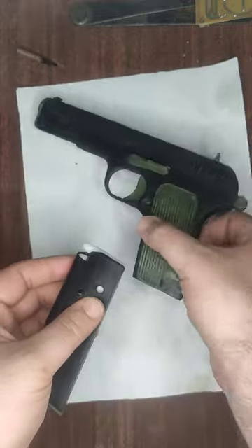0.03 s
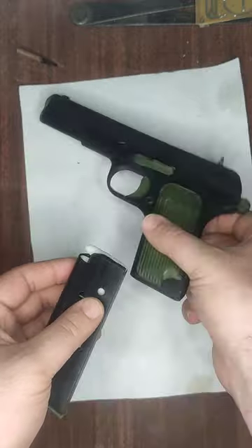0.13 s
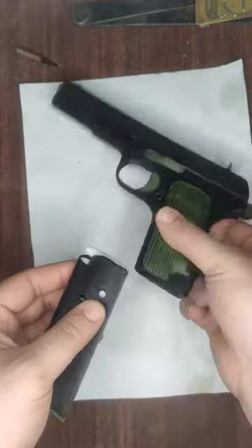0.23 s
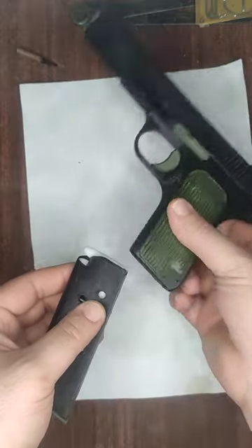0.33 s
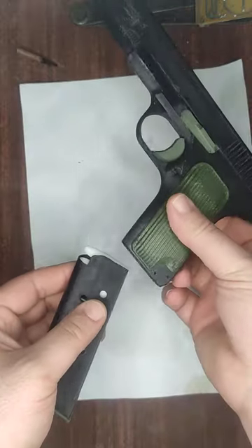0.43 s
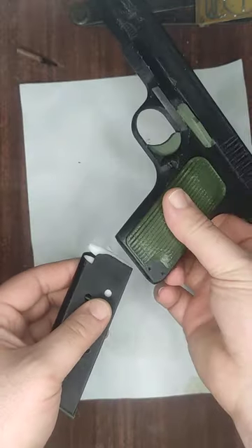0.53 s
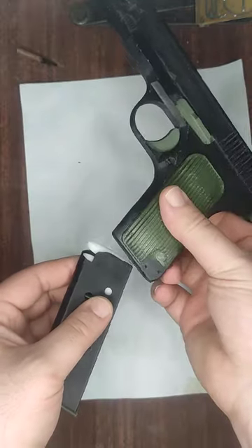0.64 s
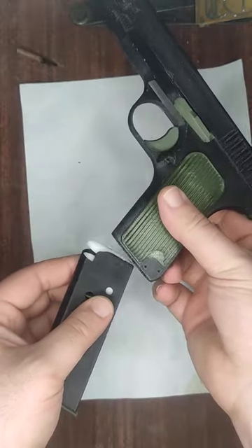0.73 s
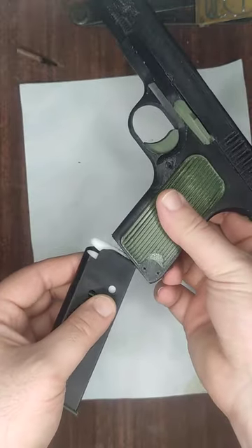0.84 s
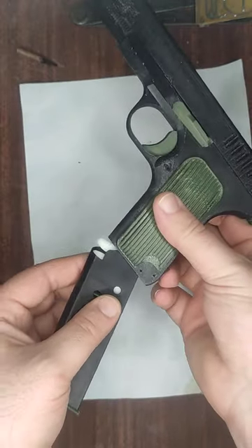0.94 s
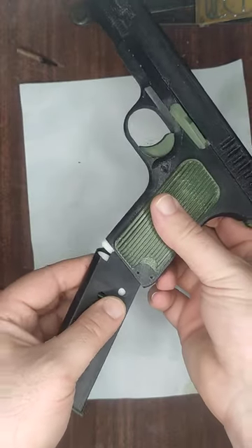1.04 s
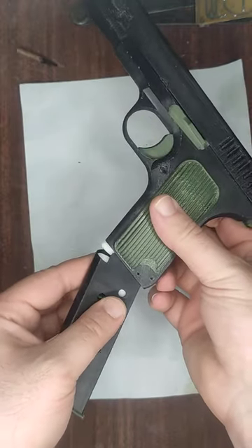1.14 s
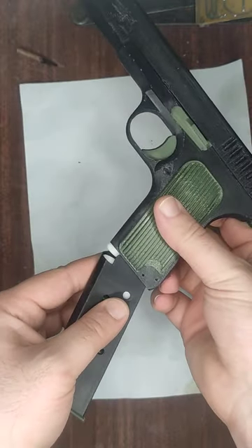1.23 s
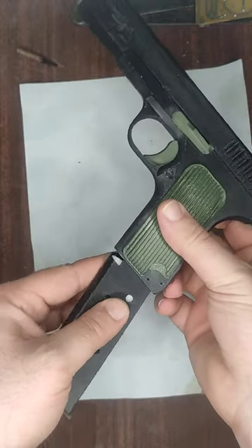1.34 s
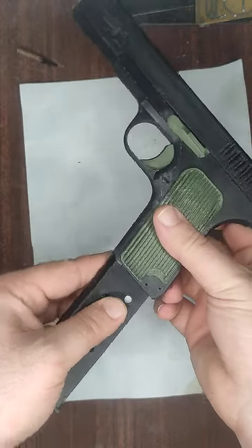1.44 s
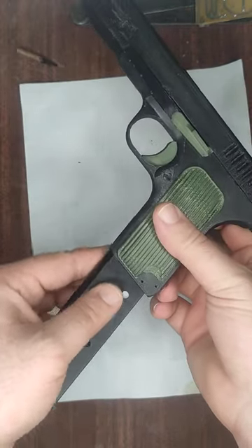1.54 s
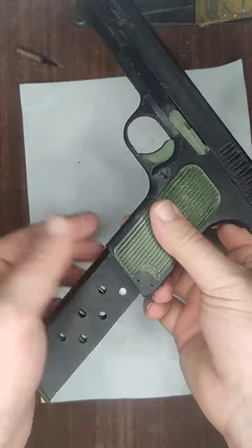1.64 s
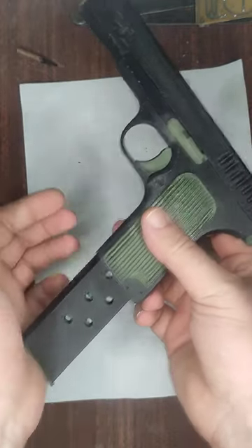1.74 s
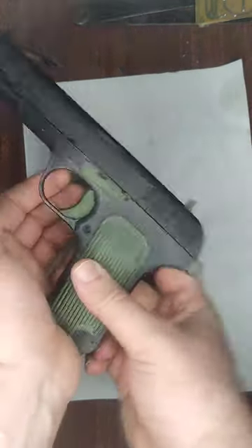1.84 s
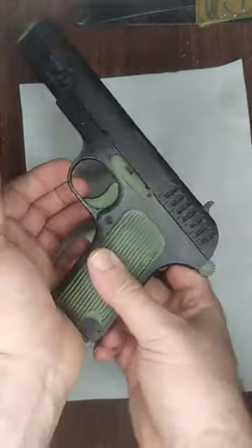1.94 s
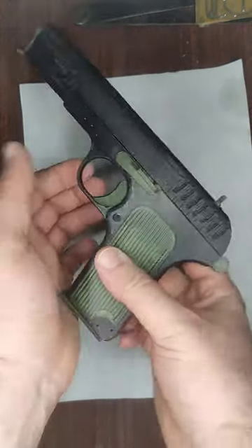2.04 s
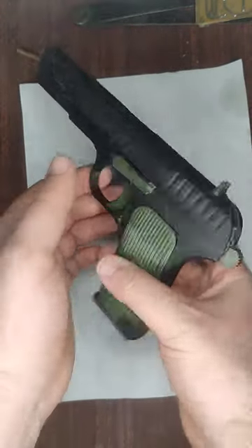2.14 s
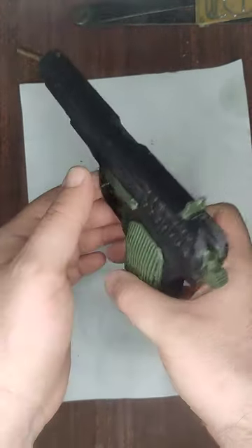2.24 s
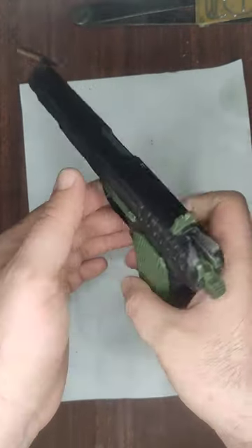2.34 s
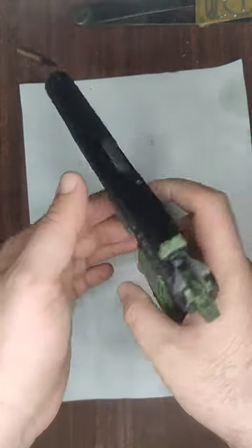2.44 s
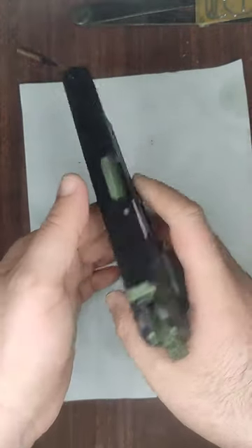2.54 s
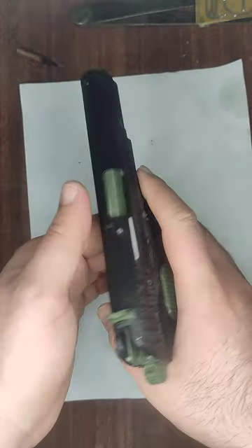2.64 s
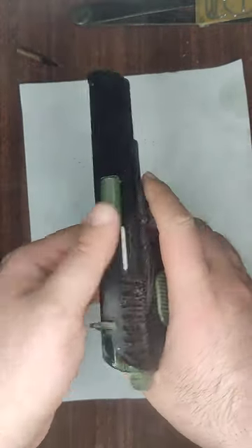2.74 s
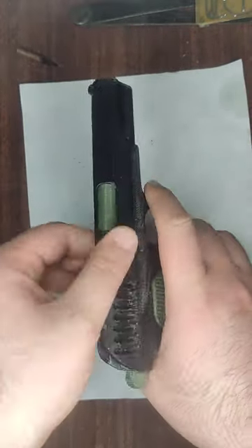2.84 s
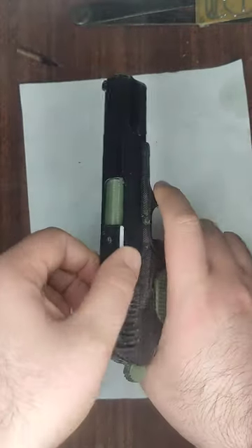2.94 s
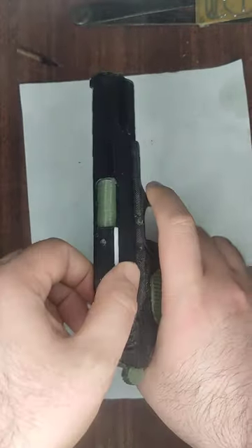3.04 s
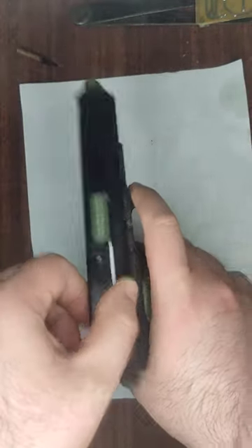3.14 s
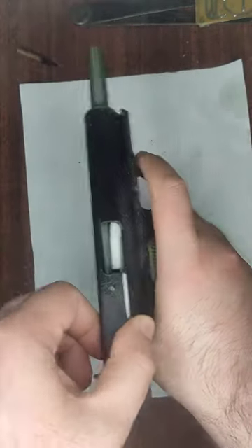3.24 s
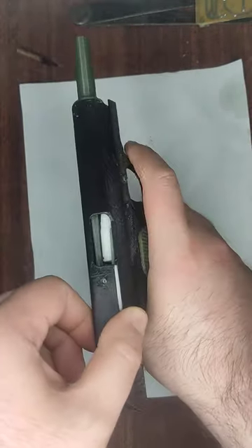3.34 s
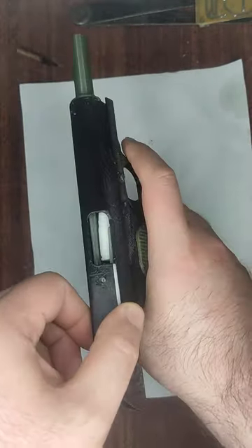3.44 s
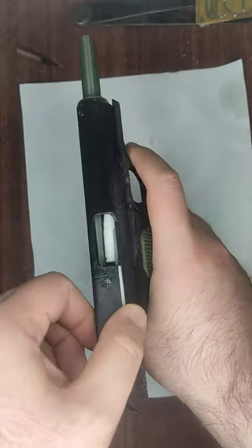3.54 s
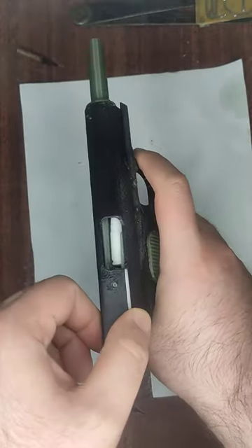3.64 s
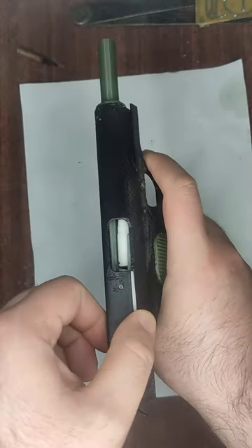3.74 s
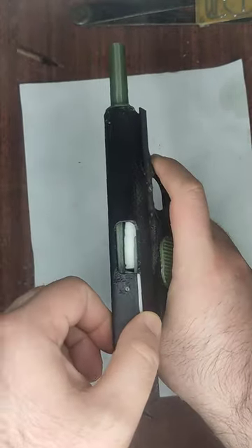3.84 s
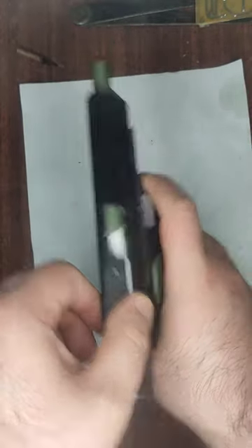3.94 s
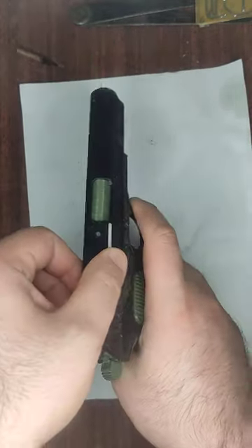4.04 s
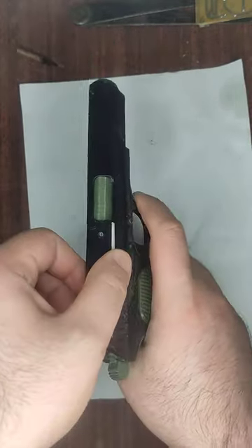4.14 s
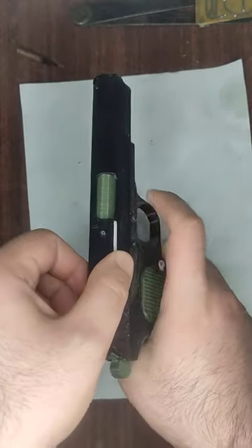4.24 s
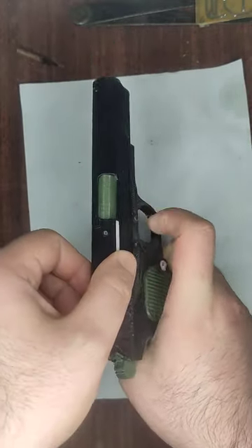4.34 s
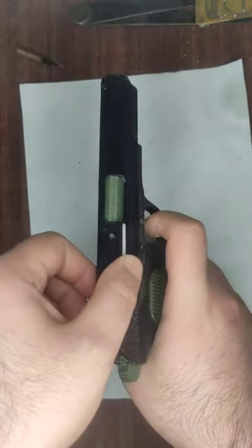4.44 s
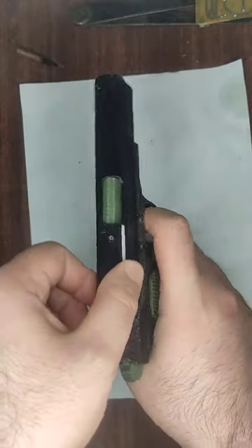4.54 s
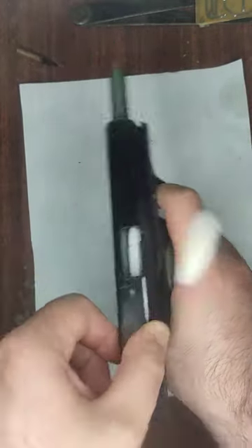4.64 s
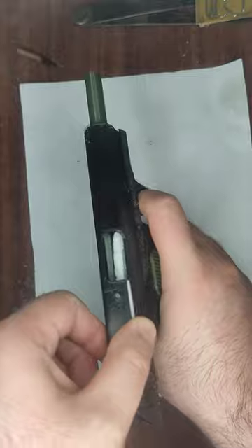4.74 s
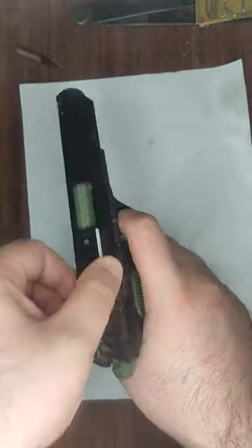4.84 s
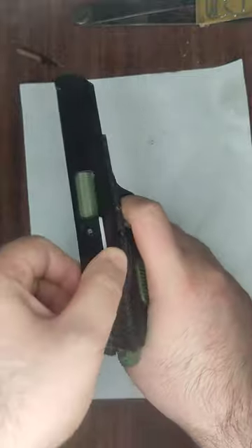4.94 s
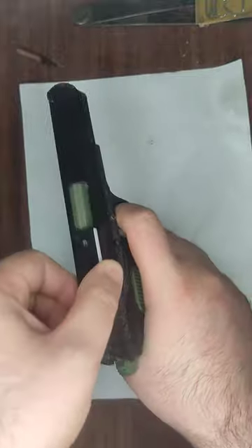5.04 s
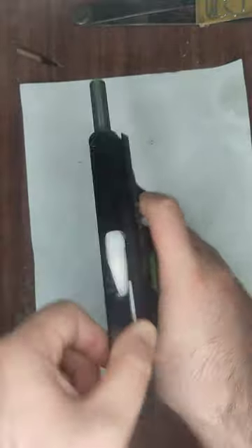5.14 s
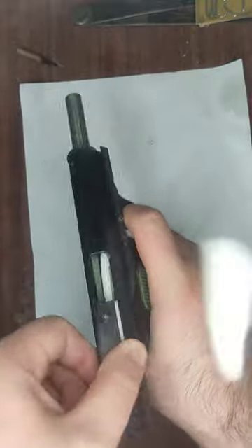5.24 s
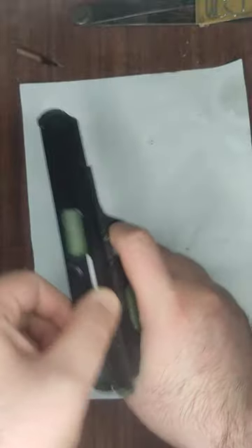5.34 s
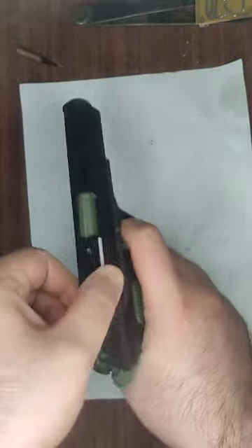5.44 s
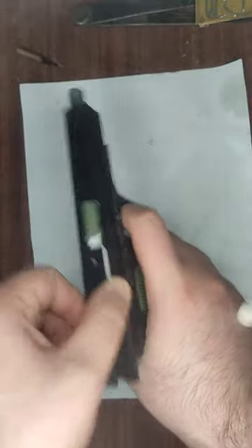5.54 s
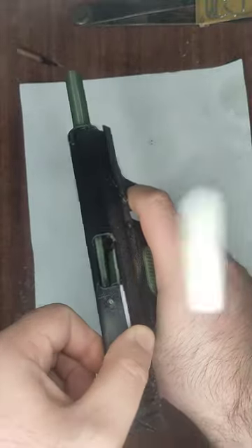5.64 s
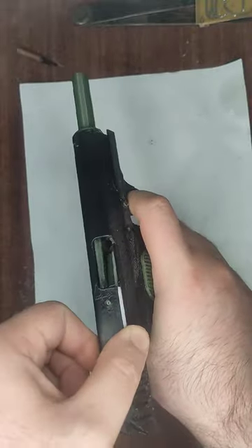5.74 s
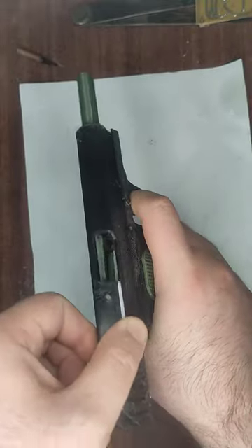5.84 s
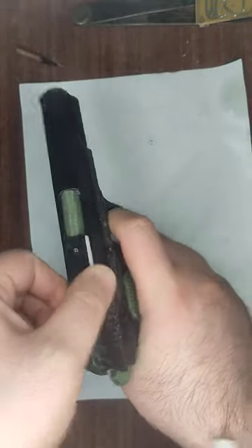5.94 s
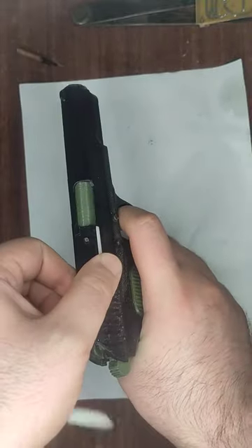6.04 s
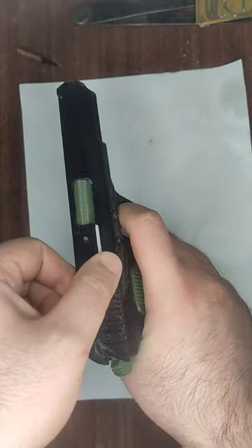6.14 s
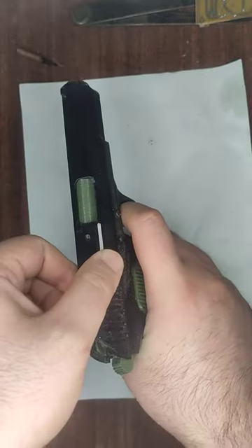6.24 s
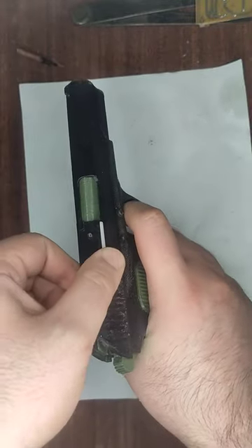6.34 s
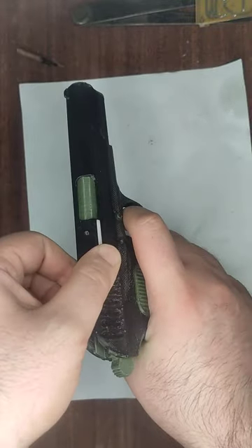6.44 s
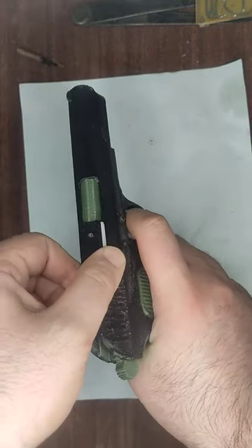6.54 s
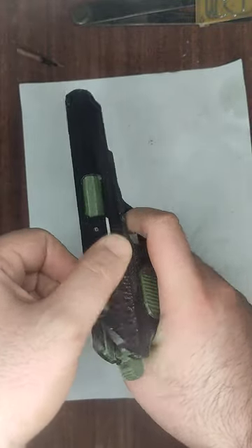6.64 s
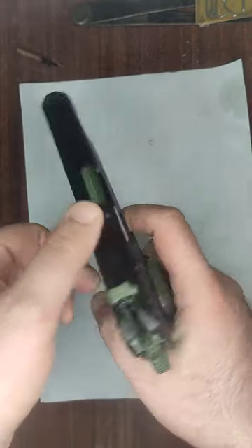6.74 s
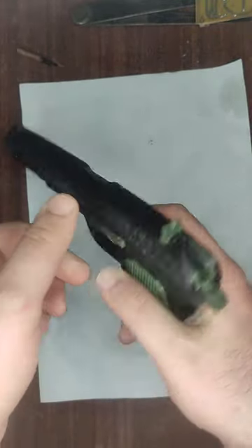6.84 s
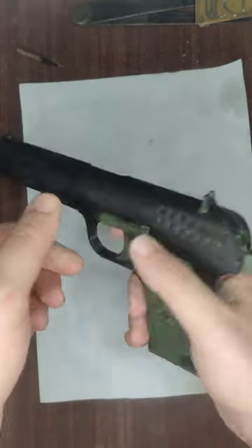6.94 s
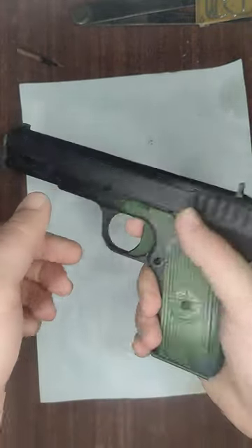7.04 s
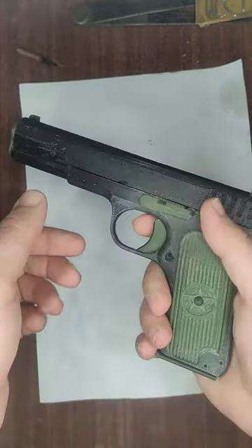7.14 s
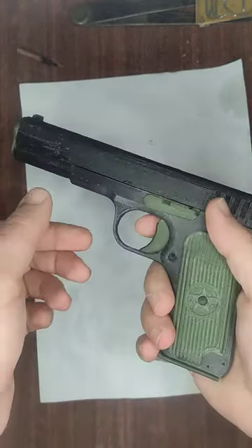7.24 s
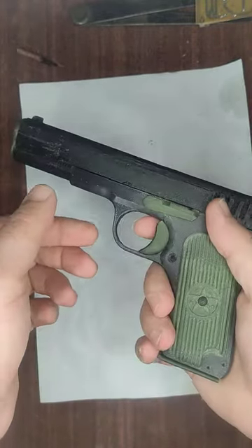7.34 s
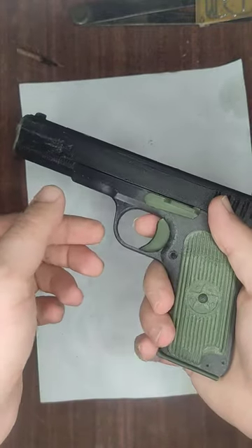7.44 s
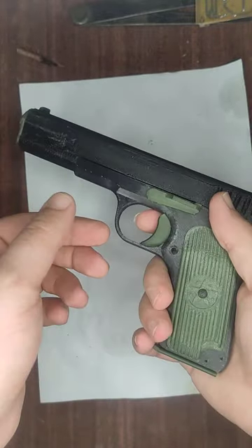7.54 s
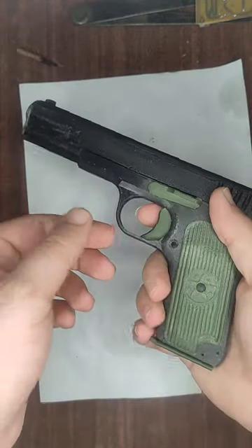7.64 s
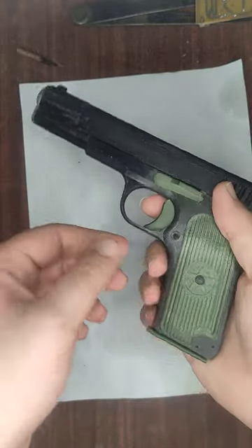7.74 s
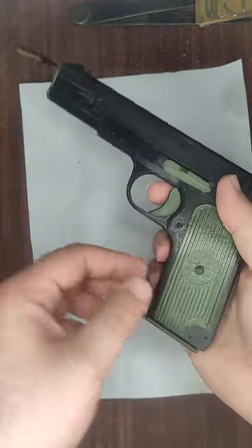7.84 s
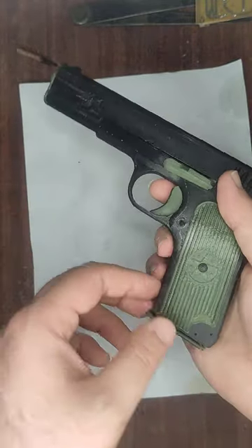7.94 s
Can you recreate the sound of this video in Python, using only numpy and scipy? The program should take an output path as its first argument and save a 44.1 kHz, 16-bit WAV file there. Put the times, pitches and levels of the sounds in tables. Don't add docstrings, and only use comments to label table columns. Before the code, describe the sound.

In a small room with a faint wavering fan hum and soft hiss, hands handle a hard plastic toy pistol close to a stereo microphone. From 0 to 1.7 seconds there are only faint skin rubs and small hollow ticks as the magazine finds its well. At about 1.8 to 1.95 it slides in with a dense rattle ending in firm clacks. Light grip shifts follow. At 3.25 the slide is jerked back with a loud scraping crack, and at 4.05 it snaps forward. Faster rackings come at 4.7 and 4.9, 5.2 and 5.45, then 5.65 and about 6.0, with sharp clicks and small air puffs between. From 5.7 a shell strikes the desk with a thin bright ring; bounces continue, strong at 6.22, tightening into a rattling roll that stops near 7.07. Quiet touches and a faint low thud at 7.5 close it.

```python
import sys
import numpy as np
from scipy import signal
from scipy.fft import rfft, irfft, next_fast_len
from scipy.io import wavfile
from scipy.ndimage import uniform_filter1d, minimum_filter1d, map_coordinates

SR = 44100
rng = np.random.default_rng(int(sys.argv[2]) if len(sys.argv) > 2 else 0)


def ratio_of_db(decibels):
    return 10 ** (np.asarray(decibels, float) / 20)


def to_wav(sig):
    pcm = np.clip(np.atleast_2d(sig), -1, 1) * 32767
    pcm = np.round(pcm).astype(np.int16)
    wavfile.write(sys.argv[1], SR, pcm.T)


N = 352781
TOP_HZ = 15900


def unit(x):
    return x / np.sqrt(np.mean(x ** 2) + 1e-20)


def along(points, hz):
    f, v = np.transpose(points)
    return np.interp(np.log(hz + 1), np.log(f + 1), v)


def wobble(rate):
    knots = rng.standard_normal(int(N * rate / SR) + 4)
    return map_coordinates(knots, [np.arange(N) * rate / SR])


def noise():
    return rng.standard_normal((2, N))


def filtered(x, response):
    m = next_fast_len(N + SR // 2)
    return irfft(rfft(x, m) * response(np.fft.rfftfreq(m, 1 / SR)), m)[..., :N]


def causal(x, gain):
    g = gain(np.fft.rfftfreq(8192, 1 / SR))
    cepstrum = irfft(np.log(g + 1e-6))
    cepstrum[1:len(cepstrum) // 2] *= 2
    cepstrum[len(cepstrum) // 2 + 1:] = 0
    pulse = irfft(np.exp(rfft(cepstrum))) / np.sqrt(np.mean(g ** 2))
    return signal.oaconvolve(x, pulse[None], axes=1)[:, :N]


def resonances(modes, f):
    total = 0
    for k, (hz, width, db) in enumerate(modes):
        total = total + (-1) ** k * ratio_of_db(db) * 1j * f * width / (hz * hz - f * f + 1j * f * width)
    return total


def struck(rows, knock_db, lost, ms):
    return [(s, db, knock_db - lost * db, edge_db, hz, ms) for s, db, edge_db, hz in rows]


def rubbed(rows, knock_db, lost):
    return [(*row, knock_db - lost * max(row[2:]), edge_db) for *row, edge_db in rows]


def struck_part(burst, hz, q, db):
    noted = burst + ratio_of_db(db) * signal.lfilter(*signal.iirpeak(hz, q, SR), burst)
    return noted / uniform_filter1d(abs(noted), size=40, axis=1).max(axis=1, keepdims=True)


def add(force, s, burst, knock_db, edge_db):
    at = round(s * SR)
    force[:, :, at:at + burst.shape[1]] += burst * ratio_of_db([[[0]], [[knock_db]], [[edge_db]]])


def contact_shape(t, ms):
    chatter = ratio_of_db(2.5 * np.repeat(rng.standard_normal(len(t) // 30 + 1), 30)[:len(t)])
    blow = (1 - np.exp(-abs(t) / 0.00089)) * np.exp(-(abs(t) / (abs(ms) / 1000)) ** 1.32) * (t > 0)
    crack = ratio_of_db(-3.5) * np.exp(-abs(t - 0.001) / 0.0006) * (t > 0.001)
    graze = ratio_of_db(-19.5) * np.exp(-abs(t) / 0.002)
    return (blow + crack + graze) * chatter


def stick_slip():
    return np.clip(wobble(500), -3, 2.6)


def worked(body, modes, contacts, strokes, knock_db, edge_db, grit_db, note_db):
    # f/Hz, width/Hz, level/dB
    desk_modes = [(255, 110, -3.5), (371, 83, 3), (583, 270, -1.5)]
    lead_s = 0.006
    force = np.zeros((3, 2, N + SR))
    t = np.arange(SR // 20) / SR - lead_s
    for s, db, low_db, high_db, hz, ms in contacts:
        push = contact_shape(t, ms) * rng.standard_normal((2, len(t)))
        burst = struck_part(push, hz, q=5.9, db=note_db)
        add(force, s - lead_s, ratio_of_db(db - 11.5) * burst, low_db + knock_db, high_db + edge_db)

    catch = stick_slip()
    slips = ratio_of_db(grit_db * (catch + 0.5 * catch ** 2) + 2.2 * wobble(90))
    grit = unit(slips * noise())
    for start, end, start_db, end_db, low_db, high_db in strokes:
        rub = grit[:, round(start * SR):round(end * SR)]
        add(force, start, rub * ratio_of_db(np.linspace(start_db, end_db, rub.shape[1])), low_db, high_db)

    def edge(hz):
        return 1 / (1 + (6500 / (hz + 1)) ** 6)

    def walls(hz):
        return ratio_of_db(along(body, hz)) * (1 + sum(abs(resonances([mode], hz)) for mode in modes))

    def desk(hz):
        return abs(resonances(desk_modes, hz)) / (1 + (hz / 750) ** 4) / (1 + (190 / (hz + 1)) ** 4)

    dull = causal(force[0], lambda hz: walls(hz) * (1 - edge(hz)))
    sharp = causal(force[2], lambda hz: walls(hz) * edge(hz))
    knock = causal(force[1].mean(0) * 1.28 + 0.48 * force[1], desk)
    return dull + sharp + knock


def slide():
    # t/s, peak level/dB, bright edge level/dB, note f/Hz
    pulls = [(3.25, -0.5, -11.5, 1140), (3.258, -12.5, -33, 1400), (3.286, -14.5, -5.5, 2800),
             (3.293, -5.5, -8.5, 2600), (3.303, -18.5, -17, 3300), (4.676, -2.5, -8.5, 1860),
             (4.709, -5, -8, 5000), (4.718, -0.5, -13.5, 2340), (4.728, -18.5, -23, 4630),
             (4.733, -19.5, -25.5, 1500), (5.195, -0.5, -13.5, 2300), (5.235, -6, -25, 1890),
             (5.244, -3.5, -12, 2920), (5.256, -15, -28, 1320), (5.639, -1.5, -10, 2230),
             (5.677, -6, -9.5, 1860), (5.688, -4, -13.5, 1340)]
    # t/s, peak level/dB, bright edge level/dB, note f/Hz
    returns = [(4.03, -14.5, -10, 3440), (4.056, -9, -4.5, 3000), (4.063, -6.5, -3.5, 3080),
               (4.073, -1.5, -9, 1560), (4.084, -14, -18.5, 1573), (4.09, -17.5, -21.5, 1500),
               (4.869, -16, -8.5, 3450), (4.876, -17, -0.5, 3000), (4.882, -15.5, -1, 3280),
               (4.889, -7.5, -5, 2560), (4.9, -6.5, -11, 2900), (4.911, -1.5, -28, 1550),
               (5.401, -22, -21.5, 2400), (5.412, -9, -21.5, 2190), (5.428, -11, -6, 1530),
               (5.434, -13, -15.5, 1500), (5.454, -7, -32.5, 2820), (5.476, -19, -26.5, 2500),
               (6.029, -22.5, -5, 2310), (6.035, -15.5, -9, 2600), (6.043, -11, -23, 1530),
               (6.052, -15, -22.5, 1890)]
    # t/s, peak level/dB, bright edge level/dB, note f/Hz
    snaps = [(1.92, -8, -9, 1410), (1.925, -6.5, -7, 4700), (1.935, -6.5, -12.5, 1460),
             (1.941, -9, -11.5, 1900), (2.037, -33, -25, 2500), (3.225, -37, -12.5, 1950),
             (3.593, -46.5, -35, 1400), (3.989, -44.5, -9.5, 2066), (4.587, -37, -15, 1040),
             (4.621, -47.5, -9, 1170), (4.647, -29.5, -9.5, 1480), (4.815, -1.5, -16.5, 1020),
             (4.989, -1, -13, 3000), (5.136, -8.5, -10, 4200), (5.141, -14.5, -9, 2380),
             (5.147, -17.5, -14, 3000), (5.361, -17, -17, 1550), (5.368, -17, -26.5, 2500),
             (5.507, -3, -17.5, 2880), (5.809, -1.5, -11, 3420)]
    # start t/s, end t/s, start level/dB, end level/dB
    strokes = [(1.853, 1.941, -38, -17), (3.229, 3.249, -57, -34.5), (3.248, 3.305, -25.5, -24.5),
               (4.001, 4.027, -50, -32), (4.028, 4.056, -27, -19.5), (4.053, 4.068, -19.5, -22.5),
               (4.074, 4.091, -32, -36), (4.68, 4.735, -25, -26.5), (4.87, 4.884, -22.5, -19),
               (4.889, 4.906, -21, -19.5), (4.914, 4.928, -29.5, -35.5), (4.999, 5.059, -28, -26.5),
               (5.137, 5.212, -25, -40), (5.193, 5.256, -29.5, -24.5), (5.391, 5.426, -38.5, -28),
               (5.426, 5.48, -21, -40.5), (5.635, 5.7, -32, -35.5), (5.976, 6.044, -45.5, -32.5),
               (6.97, 7.08, -53, -46)]
    # f/Hz, level/dB
    frame_colour = [(290, -48.5), (500, -10), (1090, 3.5), (1840, -0.5), (2390, 0.5), (5190, -2),
                    (7170, -7), (10200, -7.5), (11100, -10.5), (15300, -16), (16500, -39)]
    # f/Hz, width/Hz, level/dB
    frame_modes = [(1500, 800, -3), (2900, 1400, -2), (4790, 440, -3), (8800, 590, -1), (9960, 1000, -2)]
    contacts = struck(pulls, knock_db=-28.5, lost=0.87, ms=3.64)
    contacts += struck(returns, knock_db=-31.5, lost=0.9, ms=4.7)
    contacts += struck(snaps, knock_db=-28, lost=0.25, ms=3.3)
    rails = [(*row, 11 + 0.7 * max(row[2:])) for row in strokes]
    return worked(frame_colour, frame_modes, sorted(contacts), rubbed(rails, knock_db=-37.5, lost=0.54),
                  knock_db=8.5, edge_db=8.0, grit_db=1.0, note_db=1.5)


def magazine():
    # t/s, peak level/dB, bright edge level/dB, note f/Hz
    fitting = [(0.674, -27, -20, 1550), (0.691, -39, -35, 1500), (0.748, -37.5, -19, 1640),
               (0.845, -48, -20, 1480), (0.958, -34, -36, 1500), (0.966, -33, -36, 1260),
               (0.975, -37, -27, 1520), (1.077, -34, -21, 1400), (1.094, -52, -13, 1520),
               (1.119, -24.5, -19, 980), (1.31, -51, -12, 1760), (1.342, -37, -34, 1280),
               (1.375, -41.5, -34, 1550), (1.423, -36, -23, 1500), (1.427, -23, -20, 3830),
               (1.434, -36, -26, 1400), (1.605, -49, -12.5, 1600), (1.633, -49, -6, 1750),
               (1.692, -30, -21, 1130), (1.72, -34, -19, 1360), (1.79, -32.5, -20, 1414)]
    # t/s, peak level/dB, bright edge level/dB, note f/Hz
    seating = [(1.817, -20.5, -26, 1441), (1.83, -27.5, -23.5, 1500), (1.841, -22, -17.5, 1500),
               (1.849, -18, -17.5, 1697), (1.873, -12.5, -22.5, 1437), (1.879, -12.5, -23.5, 1384),
               (1.885, -14, -13, 1782), (1.902, -20.5, -13, 1200), (1.911, -17.5, -12.5, 1300)]
    # t/s, peak level/dB, bright edge level/dB, note f/Hz
    grip = [(0.015, -41.5, 2.5, 1087), (0.191, -50.5, 4, 1087), (0.239, -62, -13, 1087),
            (0.317, -43, -14, 1100), (2.26, -43, -30, 1080), (2.304, -29.5, -34, 853),
            (2.311, -24.5, -16.5, 2000), (2.323, -37, -35, 2000), (2.336, -33.5, -40, 1150),
            (2.387, -37.5, -36, 1150), (2.426, -28.5, -13, 1210), (2.666, -54.5, -13, 1087),
            (2.835, -44.5, -22, 1080), (3.097, -50.5, -28, 1100), (3.188, -43, -8.5, 2000),
            (7.183, -35, -11.5, 2200), (7.502, -47, -7.5, 2523), (7.852, -48, -13, 1080)]
    # start t/s, end t/s, start level/dB, end level/dB, bright edge level/dB
    strokes = [(0, 0.048, -63, -56, 15.5), (0.047, 0.115, -58.5, -76, 20), (0.951, 0.988, -59, -78, -8),
               (1.079, 1.154, -43.5, -67, -24), (1.252, 1.458, -66, -58, -10),
               (1.625, 1.723, -59, -52.5, -12), (1.779, 1.87, -55, -25.5, -9.5),
               (1.871, 1.92, -34.5, -29.5, 6), (2.111, 2.17, -55, -48.5, -4.5), (2.6, 2.939, -79, -61, 3),
               (2.936, 3.201, -67.5, -83, 8.5), (7.17, 7.25, -57.5, -71, -7)]
    # start t/s, end t/s, start level/dB, end level/dB, bright edge level/dB
    palm = [
        (0.238, .3, -60, -71, 6),
        (7.5, 7.56, -65.5, -74, -11),
    ]
    # f/Hz, level/dB
    hollow_colour = [(290, -55.5), (500, -13.5), (1480, 0), (2160, -6), (3770, -12.5), (5670, -27.5),
                     (6100, -33), (9600, -33.5), (15300, -42), (16500, -54)]
    # f/Hz, width/Hz, level/dB
    hollow_modes = [(1430, 400, -7), (1750, 350, -10.5), (3897, 390, -5.5), (6370, 160, 9)]
    contacts = struck(fitting, knock_db=-44.5, lost=0.69, ms=5.2)
    contacts += struck(seating, knock_db=-46.5, lost=0.3, ms=8.7)
    contacts += struck(grip, knock_db=-20.5, lost=0.37, ms=4.9)
    rubs = rubbed(strokes, knock_db=-43, lost=0.47) + rubbed(palm, knock_db=10, lost=0)
    return worked(hollow_colour, hollow_modes, sorted(contacts), rubs,
                  knock_db=6.0, edge_db=10.5, grit_db=-1.5, note_db=8.0)


def ringing(modes, length, lag, scatter_db):
    t = np.arange(round(length * SR)) / SR
    turn = np.array([[0], [0.25]])
    total = 0
    for hz, db, t60 in modes:
        fading = ratio_of_db(db + rng.normal(0, scatter_db, (2, 1)) - 60 * t / t60)
        total = total + fading * np.sin(2 * np.pi * (hz * t + rng.random() + turn))
    return total * (1 - np.exp(-t / lag))


def shells():
    # t/s, peak level/dB, bright edge level/dB, note f/Hz
    bounces = [(5.712, -11.5, 2, 4230), (5.832, -8.5, -16, 3200), (5.932, -11.5, -2.5, 3170),
               (5.973, -18, -31, 2260), (5.996, -19.5, -8, 2970), (6.067, -25.5, -5.5, 2110),
               (6.149, -20.5, -17.5, 3160), (6.197, -27.5, -23, 3240), (6.224, -2.5, -5.5, 2400),
               (6.345, -25, -8.5, 4710), (6.35, -7.5, -31, 1640), (6.436, -16.5, -39, 1540),
               (6.469, -12, -23, 1250), (6.507, -24, -20, 4500), (6.517, -11, -7, 4230),
               (6.629, -13, -9, 5100), (6.64, -20.5, -27, 5300), (6.721, -15.5, -12, 3950),
               (6.731, -24, -4.5, 1430), (6.776, -32.5, -12.5, 4370), (6.796, -19, -20.5, 2300),
               (6.84, -41, -23, 3000), (6.852, -21, -20, 4790), (6.857, -22, -22, 2520),
               (6.912, -44, -26, 2240), (6.918, -19.5, -7.5, 2660), (6.926, -21, -26, 2600),
               (6.971, -21, -16, 2860), (6.98, -28, -20, 3550), (7.003, -21.5, -32, 2520),
               (7.013, -21, -21, 3500), (7.032, -25, -39, 2410), (7.041, -32, -39.5, 2990),
               (7.052, -22, -47, 2170), (7.069, -36, -43, 2000)]
    # start t/s, end t/s, start level/dB, end level/dB, bright edge level/dB
    rolls = [
        (6.24, 6.599, -48.5, -45, -9.5),
        (6.602, 7.069, -49, -45, -29),
    ]
    # f/Hz, level/dB, time to fade 60 dB/s
    shell_ring = [(9500, -10, 0.11), (9900, -13, 0.18), (10200, -5.5, 0.49), (9700, 2.5, 0.1)]
    # f/Hz, level/dB, time to fade 60 dB/s
    tube_modes = [(4522, -7.5, .4), (5981, -9, .3), (6720, -12, .25), (7273, -4, .7), (7628, -9, .15),
                  (8165, -9, .5), (8497, -10, .3), (9940, -5, .4), (10609, -4, .5), (11338, -12, .5),
                  (12745, -8, .2), (13410, -8, .3), (14050, -9, .3), (15014, -8, .2)]
    # f/Hz, level/dB, time to fade 60 dB/s
    cap_modes = [(5507, -18, .3), (6900, -17, .2), (8662, -15, .25), (9485, -12, .2), (9780, -9, .15),
                 (11800, -11, .3), (12010, -17, .25), (12392, -16, .25), (13243, -14, .25),
                 (13754, -10, .18), (14158, -12, .25), (14330, -15, .25), (14530, -13, .25),
                 (15500, -16, .12)]
    # f/Hz, level/dB
    casing_colour = [(290, -38), (500, -8), (1090, -6.5), (1570, -3.5), (4830, -4.5), (7060, -10.5),
                     (9190, -10.5), (9890, 4.5), (11100, -20.5), (15300, -20.5), (16500, -35.5)]
    # f/Hz, width/Hz, level/dB
    casing_modes = [(1300, 220, -14.5), (1640, 220, -18)]
    out = np.zeros((2, N + SR))
    n = SR // 3
    for s, db, high_db, _ in bounces:
        strength = ratio_of_db(db + high_db - 23.0 + 3.5 * wobble(150)[:n])
        out[:, round(s * SR):][:, :n] += strength * ringing(shell_ring, n / SR, lag=0.001, scatter_db=1.0)

    struck_s, caught_s = 5.712, 5.806
    tube = ratio_of_db(-24) * ringing(tube_modes + cap_modes, caught_s - struck_s, lag=0.014, scatter_db=1.3)
    n = tube.shape[1]
    tube = ratio_of_db(1.5 * wobble(40)[:n]) * tube * signal.windows.tukey(n, 0.1)
    out[:, round(struck_s * SR):][:, :n] += tube

    contacts = struck(bounces, knock_db=-25.5, lost=0.083, ms=5.9)
    rattle = worked(casing_colour, casing_modes, contacts, rubbed(rolls, knock_db=-12, lost=0),
                    knock_db=9.0, edge_db=12.0, grit_db=1.5, note_db=-4.5)
    return out[:, :N] + rattle


def thuds():
    # t/s, level/dB, f/Hz, time to fade 60 dB/s
    blows = [(0.238, -35, 264, 0.071), (.245, -45, 420, .1), (1.936, -53.5, 86.5, 0.1),
             (1.936, -36, 520, .07), (2.307, -32, 998, 0.046), (2.308, -36, 452, .04),
             (4.074, -29.5, 401, .08), (4.075, -29, 1610, .28), (4.815, -30, 410, 0.065),
             (4.914, -26.5, 1590, .1), (4.997, -43.5, 126, 0.58), (5.507, -25.5, 385, 0.064),
             (5.69, -31.5, 453, 0.064), (5.712, -33, 265, 0.17), (5.714, -34, 370, 0.18),
             (5.716, -38, 578, 0.28), (5.834, -37.5, 268, .12), (5.933, -39, 265, 0.099),
             (6.226, -31, 371, 0.16), (6.226, -30.5, 1590, 0.072), (6.351, -36, 360.5, 0.19),
             (6.469, -32, 373, 0.073), (6.519, -41, 373, 0.25), (7.5, -47.5, 131, 0.33),
             (7.505, -50, 270, .15)]
    out = np.zeros(N + SR)
    t = np.arange(SR // 2) / SR
    for s, db, hz, t60 in blows:
        flutter = ratio_of_db(5 * np.clip(wobble(45)[:len(t)], -2.5, 0.7))
        tone = np.sin(2 * np.pi * hz * t + 1.2 * wobble(hz / 12)[:len(t)])
        onset = 1 - np.exp(-2 * hz * t)
        out[round(s * SR):][:len(t)] += flutter * ratio_of_db(db - 60 * t / t60) * tone * onset
    return out[:N] * np.ones((2, 1))


def puffs():
    # t/s, peak level/dB
    lumps = [(3.249, -67), (3.292, -53.5), (4.679, -55), (4.708, -53), (4.812, -37.5), (4.989, -43),
             (5.194, -58), (5.506, -56), (5.638, -48.5), (5.689, -52), (5.808, -40.5), (5.994, -56),
             (6.35, -62)]
    out = np.zeros((2, N + SR))
    u = np.arange(SR // 10) / SR / 0.0014
    lump = u * (2 - u) * np.exp(-u)
    for s, db in lumps:
        out[:, round(s * SR):][:, :len(u)] += ratio_of_db(db + 12.0 + rng.normal(0, 4.5, (2, 1))) * lump
    return out[:, :N]


def room(x):
    # f/Hz, time to fade 60 dB/s
    fading = [(200, 0.48), (1500, 0.27), (4000, 0.3), (10000, 0.21), (16000, 0.24)]
    out = np.zeros((2, N + SR))
    step = SR // 4
    for at in range(0, N, step):
        hz, t, z = signal.stft(rng.standard_normal((2, SR // 2)), SR, nperseg=256)
        tail = signal.istft(z * ratio_of_db(-60 * t / along(fading, hz)[:, None]), SR, nperseg=256)[1]
        wet = signal.fftconvolve(x[:, at:at + step], tail / np.linalg.norm(tail[0]), axes=1)
        out[:, at + 200:][:, :wet.shape[1]] += wet
    return out[:, :N]


def alike(pair):
    # f/Hz, likeness (-1 to 1)
    likeness = [(60, 0.34), (130, 0.83), (290, 0.75), (640, -0.05), (1410, -0.64), (3100, 0.02),
                (6820, -0.34), (15000, -0.13)]

    def mixing(hz):
        turn = np.arccos(np.clip(along(likeness, hz), -1, 1)) / 2
        return np.array([np.cos(turn), np.sin(turn)])

    mid, side = filtered(pair, mixing)
    return np.array([mid + side, mid - side])


def air():
    # f/Hz, level/dB
    air_colour = [(15, -62), (25, -36), (90, -17), (118, -13.5), (159, -20.5), (226, -3.5), (252, -12),
                  (445, -15), (927, -17.5), (1220, -21), (6730, -38), (15200, -39.5), (16500, -52)]
    # f/Hz, width/Hz, level/dB
    fan = [(125.4, 30, -63.5), (230.1, 63, -59), (332, 25, -71)]
    # t/s, level/dB
    loudness = [(0.0, -53), (0.38, -57.5), (4.449, -57.5), (5.15, -53.5), (8.0, -58)]
    hiss = unit(filtered(noise(), lambda hz: ratio_of_db(along(air_colour, hz))))
    hum = 0
    for hz, width, db in fan:
        tone = unit(filtered(noise(), lambda f: resonances([(hz, width, 0)], f) ** 2))
        hum = hum + ratio_of_db(db + 1.7 * wobble(4.8)) * tone
    s, db = np.transpose(loudness)
    swell = ratio_of_db(np.interp(np.arange(N) / SR, s, db) + 55)
    return swell * alike(ratio_of_db(-56.0 + 1.0 * wobble(3)) * hiss + hum)


def scene():
    pistol_slide, clip_body, shell, desk = slide(), magazine(), shells(), thuds()
    shell_far = filtered(shell, lambda hz: 1 / (1 + (hz / 10200) ** 20))
    far = ratio_of_db(-1) * clip_body + pistol_slide + desk + shell_far
    return clip_body + pistol_slide + shell + desk + ratio_of_db(-7.5) * room(far) + puffs() + air()


def masked(x):
    mask_db, mask_from_hz, band_hz = -19, 10600, 700
    sparse_from_hz, sparse_db, busy_db = 3800, 1, -62
    make_up_db = 3.5
    jump = (np.diff(x, prepend=0) ** 2).mean(0)
    attack = uniform_filter1d(jump, size=64) > 3 * uniform_filter1d(jump, size=1500)
    spared = uniform_filter1d(1 - minimum_filter1d(1. - attack, size=200), size=64)

    hz, t, z = signal.stft(x * (1 - spared), SR, nperseg=1024, noverlap=768)
    lines = uniform_filter1d(abs(z) ** 2, size=7, axis=2)
    power = lines.mean(0)
    ring = power[(hz > mask_from_hz - 1200) & (hz < mask_from_hz - 200)].mean(0)
    busy = power[hz > sparse_from_hz].sum(0) > ratio_of_db(2 * busy_db)
    strong = lines > ratio_of_db(2 * sparse_db) * uniform_filter1d(lines, size=14, axis=1)
    keep = strong | ~busy | (hz < sparse_from_hz)[:, None]
    for low in np.arange(mask_from_hz, TOP_HZ, band_hz):
        band = (hz >= low) & (hz < low + band_hz)
        luck_db = 6 * wobble(14)[np.minimum(t * SR, N - 1).astype(int)]
        keep[:, band] &= power[band].mean(0) > ring * ratio_of_db(2 * (mask_db + luck_db))
    make_up = ratio_of_db(make_up_db * np.outer(hz > sparse_from_hz, busy))
    return x * spared + signal.istft(z * keep * make_up, SR, nperseg=1024, noverlap=768)[1][:, :N]


def starved(x):
    first_block, block = 1076, 1024
    weak_db, thin_db, from_hz = -11, 1, 2600
    hz, t, z = signal.stft(x, SR, nperseg=256, noverlap=128)
    cells = uniform_filter1d(abs(z) ** 2, size=4, axis=1)
    frame = np.maximum(np.round(t * SR).astype(int) - first_block, 0) // block
    first = np.flatnonzero(np.diff(frame, prepend=-1))
    treble = (hz > from_hz)[:, None]
    level = cells[:, hz > from_hz].sum((0, 1))
    growth = level / (np.roll(level, shift=2) + 1e-12)
    rise = np.maximum.reduceat(growth, first)[frame] > ratio_of_db(2 * 10)
    peak = np.maximum.reduceat(uniform_filter1d(cells, size=16, axis=1), first, axis=2)[:, :, frame]
    thin = cells < ratio_of_db(2 * thin_db) * uniform_filter1d(cells, size=24, axis=1)
    weak = (cells < ratio_of_db(2 * weak_db) * peak) & thin & rise & treble
    return signal.istft(z * ~weak, SR, nperseg=256, noverlap=128)[1][:, :N]


def band_limit(x):
    return signal.sosfilt(signal.butter(12, 16960, fs=SR, output="sos"), x)


def record(dry):
    # f/Hz, level difference/dB
    port_colour = [(60, -0.5), (180, 0), (550, 4), (1650, -2.5), (4970, -0.5), (15000, 1.0)]
    ports = filtered(dry, lambda hz: ratio_of_db(np.outer([0.5, -0.5], along(port_colour, hz))))
    ceiling = 0.8
    shaved = ports / (1 + abs(ports / ceiling) ** 8) ** (1 / 8) - ports
    clipped = ports + signal.lfilter(*signal.butter(2, 300, 'high', fs=SR), shaved)
    top_edge = [(TOP_HZ - 300, 0), (TOP_HZ + 100, -28), (TOP_HZ + 1000, -34), (TOP_HZ + 1100, -90)]
    mix = filtered(starved(masked(clipped)), lambda hz: ratio_of_db(along(top_edge, hz)))
    return band_limit(mix)


dry = scene()
out = record(dry)
to_wav(out)
```